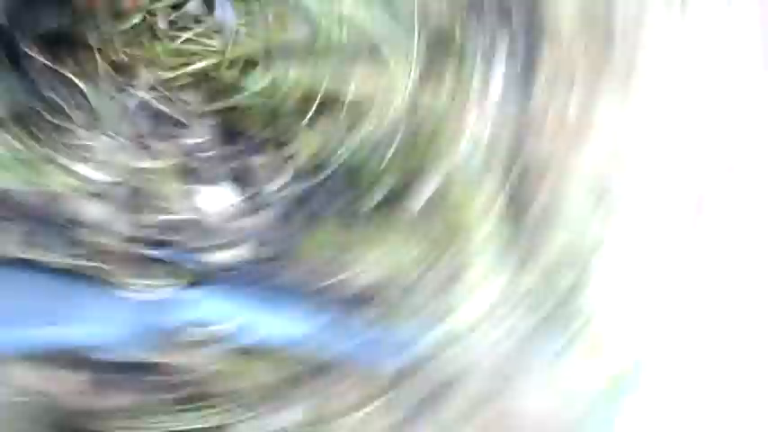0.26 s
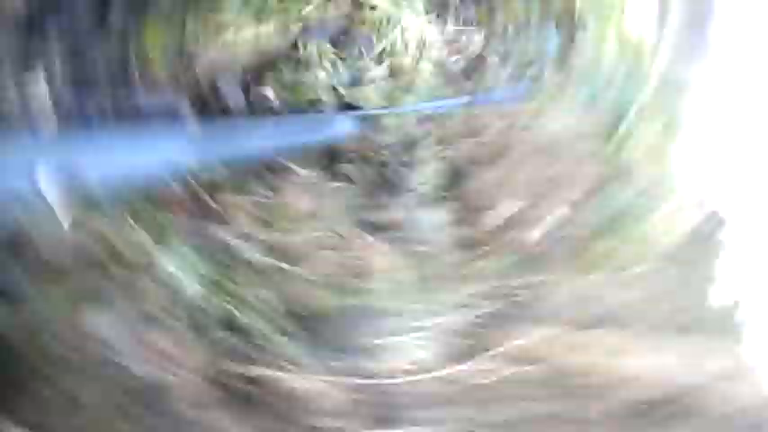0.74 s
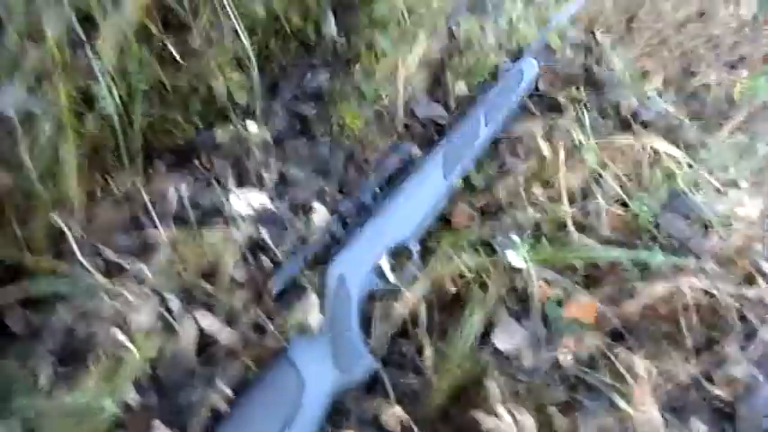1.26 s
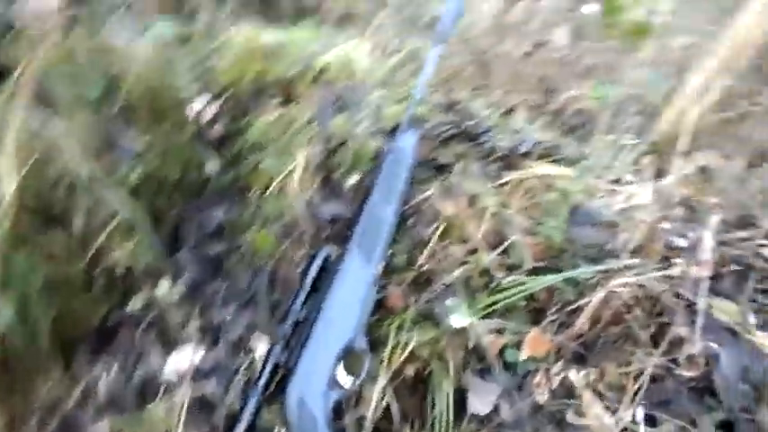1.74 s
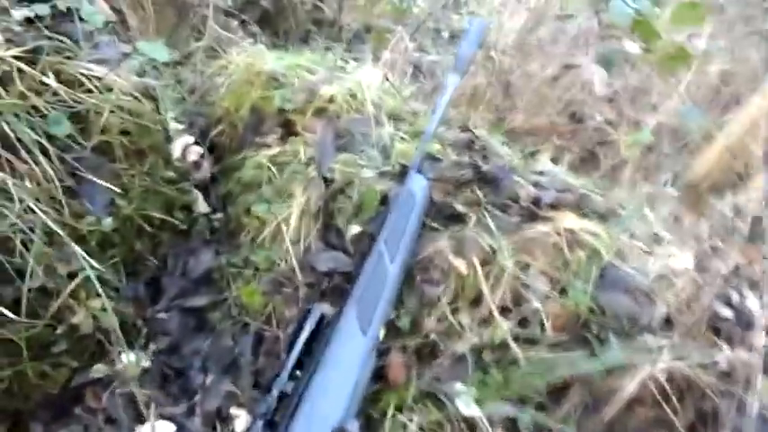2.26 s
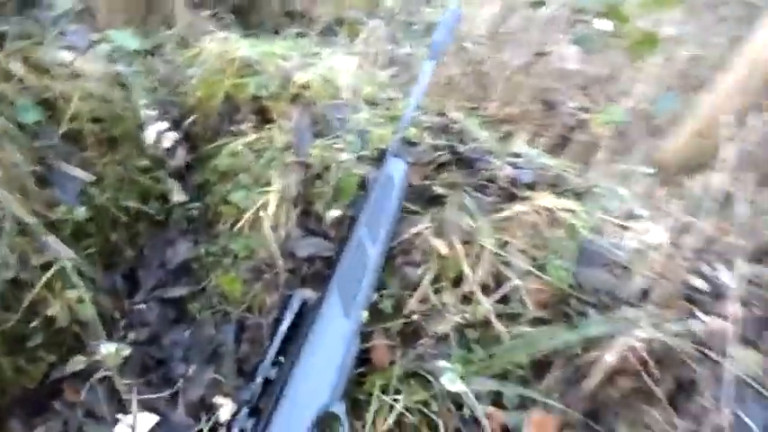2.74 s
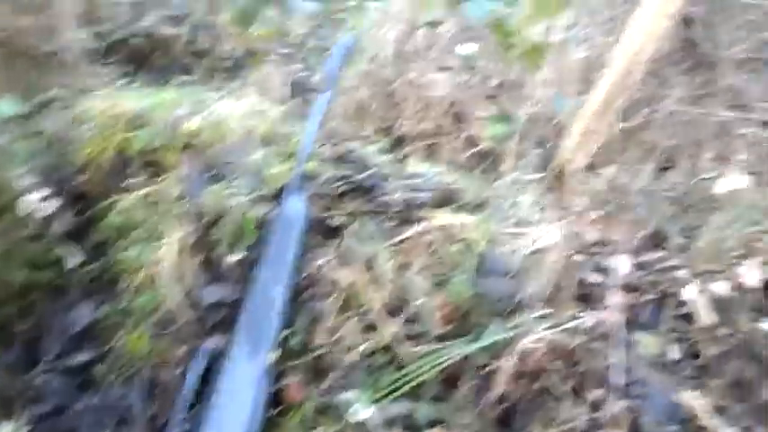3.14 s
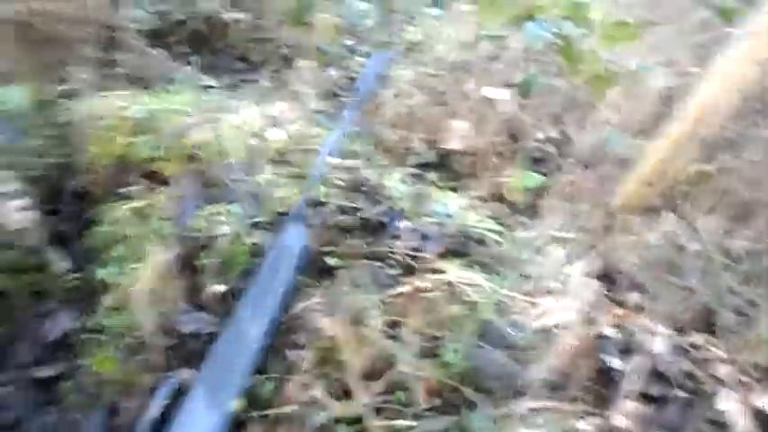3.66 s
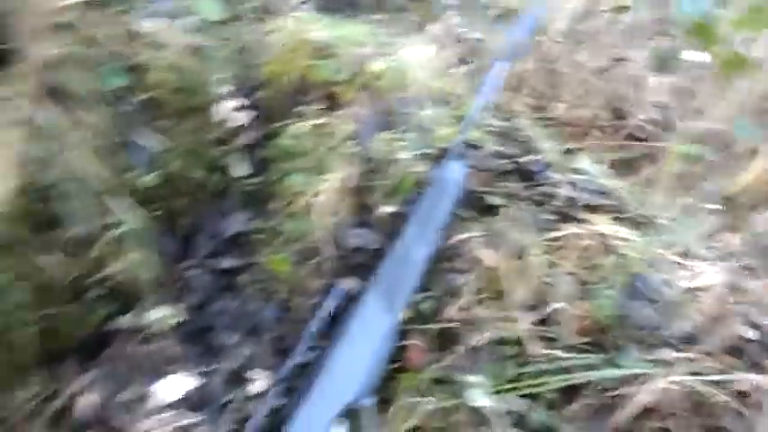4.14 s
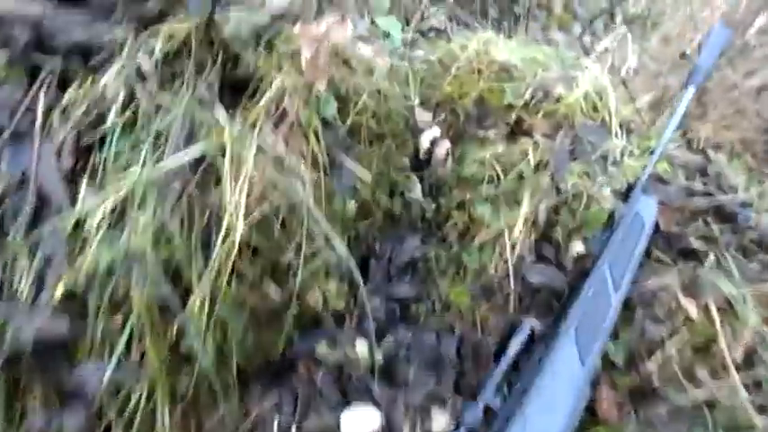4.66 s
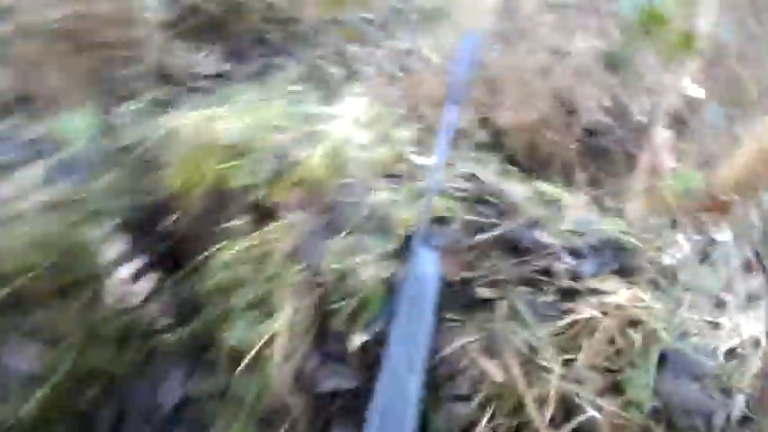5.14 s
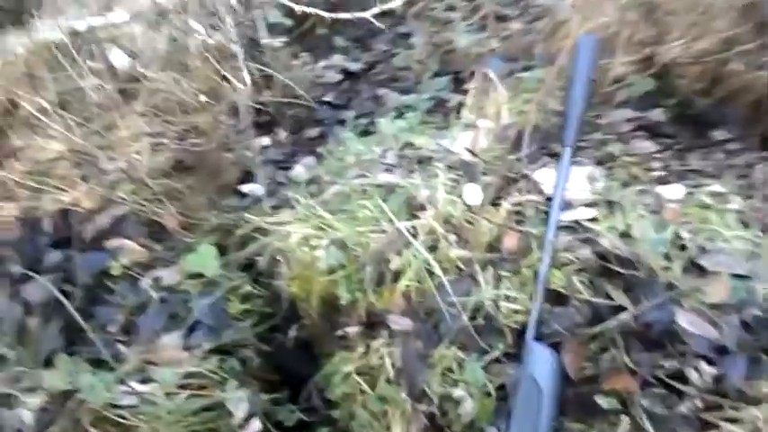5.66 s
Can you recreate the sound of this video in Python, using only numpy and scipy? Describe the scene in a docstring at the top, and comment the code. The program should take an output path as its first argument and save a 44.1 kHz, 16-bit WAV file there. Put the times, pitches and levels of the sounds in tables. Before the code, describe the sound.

Close handling of a camera over dry grass and dead leaves: early thuds and twig snaps, small creaks, then one very loud hollow clack and scrape.

```python
"""Dry grass on a lake bank

Open lake bank, everything close: someone with a hand-held camera treads and shifts in dry grass and dead leaves.
Flickering noise and grains rustle and crackle; filtered noise bursts snap as twigs and tufts under the boots.
Decaying low modes make dull bumps on the camera's case; runs of ringing slips make the grip creak.
The hardest clack rings out in a short hollow scrape. Quiet air and a thin electronic whine lie beneath."""
import sys
import numpy as np
from scipy import signal
from scipy.io import wavfile

SR = 44100
rng = np.random.default_rng(int(sys.argv[2]) if len(sys.argv) > 2 else 0)


def master(y):
    """Save y as 16-bit WAV."""
    cut = np.clip(np.atleast_2d(y).T, -1, 1)
    pcm = np.round(cut * 32767)  # scale
    wavfile.write(sys.argv[1], SR, pcm.astype(np.int16))


N = 259749
TIME = np.arange(N) / SR
# one hit in s: a 5 ms lead-in, then the spike at time 0
HIT_TIME = np.arange(-SR // 200, SR // 8) / SR


def from_db(db):
    """Decibels to gain."""
    return 10 ** (np.asarray(db) / 20)


def rms_one(x):
    """Scale to rms 1."""
    return x / np.sqrt(np.mean(x ** 2) + 1e-20)


def unit_hit(x):
    """Scale a hit to the energy of 10 ms at rms 1."""
    return x / np.sqrt(np.sum(x ** 2) / (SR / 100) + 1e-20)


def at_hz(points, hz):
    """Read a spectrum on a log-frequency axis."""
    f, db = np.transpose(points)
    return np.interp(np.log(hz), np.log(f), db)


def band(low_hz, high_hz, order=2):
    """Sections of a band-pass."""
    return signal.butter(order, [low_hz, min(high_hz, .45 * SR)], "band", fs=SR, output="sos")


def drift(rate_hz):
    """Slow random wander of rms 1: noise through two equal low-pass poles, computed every 40 samples."""
    pole = np.exp(-80 * np.pi * rate_hz / SR)
    noise = rng.standard_normal(N // 40 + 2002)
    # the first 2000 values let the filter settle
    slow = signal.lfilter([1], [1, -2 * pole, pole * pole], noise)[2000:]
    return np.interp(np.arange(N) / 40, np.arange(len(slow)), rms_one(slow))


def resonate(x, hz, width):
    """One resonance of a given width in Hz, gain 1 on top."""
    r = np.exp(-np.pi * width / SR)
    zeros = np.array([1, 0, -1]) * (1 - r * r) / 2
    poles = [1, -2 * r * np.cos(2 * np.pi * hz / SR), r * r]
    return signal.lfilter(zeros, poles, x)


def alternating_modes(x, modes, gains):
    """Resonances driven together, neighbours in opposite polarity."""
    return sum((-1) ** k * gain * from_db(db) * resonate(x, hz, width)
               for k, ((hz, width, db), gain) in enumerate(zip(modes, gains)))


def dying(t, t60):
    """Exponential decay from time 0 on, 60 dB down after t60 seconds."""
    return from_db(-60 * np.abs(t) / t60) * (t >= 0)


def spaced(first, last, count):
    """Evenly spaced values from first to last."""
    return np.linspace(first, last, max(int(round(count)), 1))


def add(out, s, hit):
    """Mix a hit in so that its spike falls at time s."""
    i = max(round((s + HIT_TIME[0]) * SR), 0)
    out[i:i + len(hit)] += hit[:N - i]


def grains(per_s, spread_db):
    """Tiny clicks of very uneven size that come in clumps; rms 1."""
    born = rng.random(N) < per_s * from_db(4 * drift(25)) / SR
    size = from_db(spread_db * np.minimum(rng.exponential(1, N), 4))
    return rms_one(born * size * rng.choice([-1, 1], N))


def coloured(colour, grain_share, patchy_db):
    """Half-octave bands of friction noise and grains, each flickering: (centres Hz, bands)."""
    edges = np.geomspace(28, 18000, num=20)
    centres = np.sqrt(edges[:-1] * edges[1:])
    share = np.clip(grain_share, 0, 1)
    # neighbouring bands take turns at two independent drives
    drives = [np.sqrt(1 - share) * rng.standard_normal(N)
              + np.sqrt(share) * grains(per_s=1500, spread_db=3.0) for _ in range(2)]
    bands = []
    for k, hz in enumerate(centres):
        flicker = from_db(at_hz(colour, hz) + patchy_db * drift(17.0))
        bands.append(signal.sosfilt(band(edges[k], edges[k + 1]), drives[k % 2]) * flicker)
    return centres, np.array(bands)


def fracture(t60, tail_db, tail_t60, spike):
    """A short swell of noise leads into a spike and a quick burst; a fainter noise tail follows."""
    swell = from_db(-4.5) * dying(-HIT_TIME, t60=0.0076)
    burst = dying(HIT_TIME, t60) + from_db(tail_db) * dying(HIT_TIME, tail_t60)
    return rng.standard_normal(len(HIT_TIME)) * (swell + burst) + spike * (HIT_TIME == 0)


def below_cut(x):
    """A small case radiates almost no deep bass."""
    return signal.sosfilt(signal.butter(2, 200, "high", fs=SR, output="sos"), x)


# low modes of the case: f/Hz, relative level/dB, t60/s at ring 1
CASE_MODES = [(255, -11, .025), (345, 0, .045), (378, -5, .1), (450, -13, .025), (590, -18, .035),
              (775, -16, .065)]


def case_thud(ring):
    """The case rings low; a firm hand damps it, and each blow weights the modes a little differently."""
    weights = from_db(1.3 * rng.standard_normal(len(CASE_MODES)))
    modes = [weight * from_db(db) * dying(HIT_TIME, t60 * ring) * np.cos(2 * np.pi * hz * HIT_TIME)
             for (hz, db, t60), weight in zip(CASE_MODES, weights)]
    # the padded contact passes little above the modes
    padded = signal.sosfilt(signal.butter(2, 1000, fs=SR, output="sos"), sum(modes))
    return unit_hit(below_cut(padded))


# still air on the bank: f/Hz, relative density level/dB per Hz
AIR_COLOUR = [(30, -11), (100, 9.5), (350, 0), (950, 2), (2000, -19), (5500, -7.5), (11500, -41),
              (15500, -34)]
AIR_DB = -61.5  # rms into the microphone
WHINE_HZ, WHINE_DB = 11700, -66  # rms into the microphone


def air():
    """Smooth outdoor hush and a thin electronic whine of the camera: narrow noise at one pitch."""
    _, bands = coloured(AIR_COLOUR, grain_share=0, patchy_db=-1.0)
    whine = resonate(rng.standard_normal(N), WHINE_HZ, width=110)
    whine = rms_one(resonate(whine, WHINE_HZ, width=110))
    return from_db(AIR_DB) * rms_one(bands.sum(axis=0)) + from_db(WHINE_DB) * whine


# a leg or sleeve sweeps through the blades close by: start t/s, length/s, brushing level/dB,
# weight level/dB and hiss level/dB, both relative to the brushing
SWISHES_CLOSE = [(0, 0.028, -32, -4, -11), (.31, .11, -33.5, -1, -11), (.98, 0.046, -43, -4, -22),
                 (1.05, 0.083, -38.5, -6, -29.5), (1.23, 0.069, -39.5, -11, -7.5),
                 (2.1, 0.12, -45.5, 6, -18), (2.73, 0.064, -45.5, 0.5, -13), (3.17, 0.11, -50, 5, -7),
                 (3.651, 0.03, -35.5, -20, -14), (3.815, 0.062, -48, -7, 8), (3.89, 0.045, -33, 7, -1.5),
                 (4.5, 0.092, -48, 3.5, 8), (4.95, 0.067, -56, 7, -1), (5.269, .14, -34.5, -3, 0),
                 (5.4, .13, -39, -7, -18), (5.74, 0.07, -43, 4.5, 1.5)]
# the swell is centred on the start, the ease-off is a decay constant; shares of the length
SWELL_SHARE, EASE_SHARE = 0.87, 0.16


def swish_powers():
    """Each swish swells, holds and eases off: power of pressing, brushing and hiss over time."""
    power = np.zeros((3, N))
    for s, length, db, weight_db, hiss_db in SWISHES_CLOSE:
        phase = (TIME - s) / length
        swell = np.clip(phase / SWELL_SHARE + .5, 0, 1)
        ease = np.exp(-np.maximum(phase - 1, 0) / EASE_SHARE)
        levels = from_db([[db + weight_db], [db], [db + hiss_db]])
        power += (levels * swell * ease) ** 2
    return power


# changing stir of grass and clothing: t/s, then control level/dB of the
# pressing (lows), the brushing (middle) and the hiss (top)
STIR_LEVELS = [(0, -39.5, -34.5, -43.5), (0.28, -40.5, -38.5, -41), (0.46, -37, -45, -41.5),
               (0.7, -42.5, -44, -44.5), (0.79, -43.5, -50, -50), (1.16, -43.5, -46, -43),
               (1.4, -43.5, -46, -56.5), (1.6, -41, -47, -52.5), (1.98, -48, -50, -55.5),
               (2.15, -44.5, -45, -49.5), (2.72, -47.5, -45.5, -48.5), (2.95, -55, -52.5, -58.5),
               (3.48, -43.5, -46, -48), (3.72, -50, -46.5, -56), (3.98, -39, -47, -51),
               (4.18, -39.5, -44.5, -45.5), (4.38, -49, -49, -48.5), (4.62, -51.5, -47, -46),
               (4.86, -50.5, -50, -52), (5.2, -41, -45, -39), (5.54, -41, -44, -46),
               (5.89, -51, -44.5, -44)]
# colour of the rustle: f/Hz, relative density level/dB per Hz
RUSTLE_SPECTRUM = [(30, -20), (60, -10.5), (130, -7.5), (230, 1), (350, 5.5), (560, -6.5), (950, -4.5),
                   (1400, -15.5), (2400, -13), (4200, 0.5), (6500, -7), (8500, 0), (11500, -2),
                   (15500, -6.5)]
# resonances that a swish excites: f/Hz, width/Hz, relative level/dB
SWISH_RESONANCES = [(930, 95, 3), (1800, 570, -11), (2800, 120, -15.5), (4120, 160, -12),
                    (5050, 130, -17.5)]
SWISH_RING_DB = -3  # relative to the brushing of the swishes


def rustle():
    """Pressing gives the lows, brushing the middle, dry blade edges the hiss; blades tick, leaves crunch at random."""
    s, *columns = np.transpose(STIR_LEVELS)
    swishing = swish_powers()
    stir = from_db([np.interp(TIME, s, db) for db in columns])
    press, brush, hiss = np.sqrt(stir ** 2 + swishing)

    centres, bands = coloured(RUSTLE_SPECTRUM, grain_share=0.32, patchy_db=2.4)
    out = np.zeros(N)
    for gain, weights in [(press, [1, 0, 0, 0]), (brush, [0, 1, 1, 0]), (hiss, [0, 0, 0, 1])]:
        # the three registers fade into each other
        shares = np.interp(np.log(centres), np.log([400, 800, 1400, 3400]), weights)
        out += gain * from_db(-1.47) * rms_one(shares @ bands)

    ticks = sum(rms_one(resonate(grains(per_s=26, spread_db=2.0), hz, width=hz / 4))
                for hz in [1900, 3800, 6500, 9800])
    crunch = sum(rms_one(resonate(grains(per_s=45, spread_db=2.0), hz, width=hz / 5))
                 for hz in [560, 800, 1050])
    friction = grains(per_s=3300, spread_db=3.5)
    ring = rms_one(alternating_modes(friction, SWISH_RESONANCES, np.ones(len(SWISH_RESONANCES))))
    out += hiss * from_db(-16) * ticks
    out += brush * from_db(-11.5) * crunch
    return out + np.sqrt(swishing[1]) * from_db(SWISH_RING_DB) * ring


def snap(db, sharp_db, thud_db, wood_hz, stalk_hz, splinter_db):
    """One stalk breaks with a knock, a crack and splinters; the case thuds along."""
    knock = signal.sosfilt(band(596, 2080), fracture(t60=.011, tail_db=-18, tail_t60=.05, spike=5))
    crack = signal.sosfilt(band(2450, 6570), fracture(t60=0.0041, tail_db=-13.5, tail_t60=0.023, spike=10.0))
    splinter = signal.sosfilt(band(8100, 14500), fracture(t60=0.0071, tail_db=-40, tail_t60=0.018, spike=1.0))
    low = unit_hit(knock + 1.87 * resonate(knock, wood_hz, width=150))
    high = unit_hit(crack + 2.54 * resonate(crack, stalk_hz, width=350))
    high = high + from_db(splinter_db) * unit_hit(splinter)
    wood = unit_hit(low + from_db(sharp_db) * high)
    return from_db(db) * wood + from_db(thud_db) * case_thud(ring=1.0)


# single twigs and stalks breaking underfoot: t/s, level/dB (rms over 10 ms, into the microphone),
# crack over knock level/dB, thud in the case level/dB, knock f/Hz, crack f/Hz
TWIG_SNAPS = [(.019, -24, -7, -20.5, 1060, 2600), (0.0274, -29, -13, -24, 1620, 2600),
              (0.2638, -19, -22, -24, 930, 2600), (0.3109, -29, -20, -43, 1000, 2600),
              (.406, -28, -5, -49, 884, 2630), (.5379, -29.5, -3, -45, 1710, 2630),
              (0.7872, -39.5, 10, -31, 840, 7300), (0.8487, -39, -1, -32.5, 960, 3600),
              (0.863, -33, 5, -34.5, 990, 4170), (.8887, -35.5, 9, -47, 1300, 3570),
              (.976, -15, 10.5, -50, 1590, 5560), (1.1352, -40, 3, -45, 1660, 2600),
              (1.1565, -37, 10, -51, 1420, 3800), (2.1085, -36, -10, -37, 810, 2450),
              (2.7832, -40, 6, -54, 790, 3800), (2.98, -52, 16, -62, 1000, 6900),
              (3.3909, -47.5, 22, -47, 980, 7400), (3.6794, -43, -1, -48, 1007, 7260),
              (3.517, -12.5, -12.5, -17, 1150, 2600), (3.524, -17.5, -9.5, -20.5, 1590, 7400),
              (3.5363, -11, -15, -28, 1140, 2600), (3.5448, -2, 6, -31, 1140, 6500),
              (3.656, -34, 8, -35, 850, 3700), (3.8415, -32, 0, -36, 1240, 3900),
              (3.9104, -12.5, -13, -33, 1800, 2600), (4.2519, -30, 0, -31.5, 1280, 4270),
              (4.3167, -29.5, -3, -32, 1260, 6400), (4.659, -35, 0, -30, 1390, 4320),
              (4.6939, -40.5, 1, -32, 880, 2590), (4.818, -31, -4.5, -32, 2090, 4290),
              (5.0621, -37.5, 2, -41.5, 1270, 3840), (5.1487, -31.5, -3, -22.5, 1250, 2570),
              (5.1546, -23, 7, -29, 1800, 3800), (5.1987, -26, 6, -32, 1720, 3970),
              (5.2331, -30.5, -2.5, -26, 980, 2800), (5.3885, -29, -5, -26.5, 970, 6150),
              (5.6248, -32.5, -1, -31.5, 1460, 4400), (5.831, -35.5, -4.5, -30, 910, 4360)]
SPLINTER_DB = -8.5  # splinters of a middling snap, relative to its crack
# loud cracks come from thick twigs, which splinter less: dB lost per dB above a middling snap
SPLINTER_LOSS, MIDDLING_DB = 0.36, -25


def snaps():
    """Single twigs break under the boots."""
    out = np.zeros(N)
    for s, db, sharp_db, thud_db, wood_hz, stalk_hz in TWIG_SNAPS:
        above_middling = db + min(sharp_db, 0) - MIDDLING_DB
        splinter_db = SPLINTER_DB - SPLINTER_LOSS * above_middling
        add(out, s, snap(db, sharp_db, thud_db, wood_hz, stalk_hz, splinter_db))
    return out


# a tuft gives way underfoot: first t/s, last t/s, stalks (rounded to whole ones), typical level/dB,
# crack over knock level/dB, case thud level/dB, splinters level/dB relative to the crack
TUFT_CRUNCHES = [(0.2053, 0.216, 2, -31, -10, -31.5, -15), (.3199, 0.403, 4, -31, -8, -36, -7),
                 (3.555, 3.588, 4.03, -36, -14, -23.5, -9), (3.878, 3.8835, 2.4, -30, -2, -31, -5),
                 (3.9012, 3.9225, 5.27, -21, -1, -25, 4), (4.4887, 4.5637, 4, -36.5, 1.5, -33.5, -5),
                 (5.7667, 5.771, 2.44, -33.5, 1, -34, 1.5)]
KNOCK_HZ, STALK_HZ = 1180, 3990  # typical knock and crack pitch
# scatter of pitch (octaves), level (dB) and time (share of the run's length per stalk)
STALK_SCATTER, STALK_SCATTER_DB, SPACING_SCATTER = 0.22, 1, .12


def crunches():
    """The stalks of a tuft break in quick succession, each a little different."""
    out = np.zeros(N)
    for first, last, stalks, db, sharp_db, thud_db, splinter_db in TUFT_CRUNCHES:
        for s in spaced(first, last, count=stalks):
            late, louder, higher = rng.standard_normal(3)
            pitch = 2 ** (STALK_SCATTER * higher)
            shift = late * SPACING_SCATTER * (last - first) / stalks
            stalk = snap(db + STALK_SCATTER_DB * louder, sharp_db, thud_db,
                         KNOCK_HZ * pitch, STALK_HZ * pitch, splinter_db)
            add(out, s + shift, stalk)
    return out


# dull bumps on the camera, at the microphone: t/s, blow level/dB before a fixed trim, thud f/Hz
CAMERA_BUMPS = [(0.3098, -19, 385), (.3504, -6, 317), (0.3806, -23, 410), (0.4113, -17, 294),
                (.446, -30.5, 310), (.548, -30, 386), (.7658, -9, 325), (.7698, -15, 383),
                (1.224, -32.5, 354), (1.2865, -28.5, 265), (4.029, -30.5, 362), (4.2986, -30, 354),
                (4.965, -30, 370), (5.2082, -22, 393)]
# the knock follows the blow (relative dB); the grit is the same at any force (dB)
BUMP_KNOCK_DB, BUMP_GRIT_DB = -21, -43.5


def bumps():
    """Soft, heavy contacts: a thud of a few cycles with a brief overtone, a little case ring and grit on top."""
    out = np.zeros(N)
    knock_band, grit_band = band(430, 1980), band(1800, 3900, order=1)
    for s, blow_db, hz in CAMERA_BUMPS:
        turn = 2 * np.pi * hz * HIT_TIME
        thud = dying(HIT_TIME, t60=.026) * np.sin(turn)
        thud = thud + .55 * dying(HIT_TIME, t60=.016) * np.sin(1.9 * turn)
        body = unit_hit(unit_hit(below_cut(thud)) + from_db(-6.5) * case_thud(ring=0.54))
        knock = signal.sosfilt(knock_band, fracture(t60=.016, tail_db=-20, tail_t60=.04, spike=9))
        grit = signal.sosfilt(grit_band, fracture(t60=0.018, tail_db=-11, tail_t60=0.034, spike=8.3))
        hit = from_db(blow_db - 2.5) * body
        hit = hit + from_db(blow_db + BUMP_KNOCK_DB) * unit_hit(knock)
        add(out, s, hit + from_db(BUMP_GRIT_DB) * unit_hit(grit))
    return out


# runs of evenly spaced slips of the grip, at the microphone: first t/s, last t/s,
# slips (rounded to whole ones when played), first and last thud level/dB
GRIP_CREAKS = [(1.383, 1.4114, 2.3, -39.5, -41), (1.4547, 1.4964, 4.2, -41, -48),
               (1.5043, 1.515, 1.8, -32.5, -27.5), (1.521, 1.629, 5.85, -31.5, -26.5),
               (1.6606, 1.687, 2.5, -24.5, -29), (1.7214, 1.9015, 3.39, -28.5, -25.5),
               (3.7386, 3.7994, 3, -20, -27), (3.7838, 3.809, 1.6, -34, -27)]
# resonances of the case that colour a creak: f/Hz, width/Hz, relative level/dB
CREAK_RESONANCES = [(775, 80, 2), (1050, 150, -4), (1800, 240, 0), (2120, 250, -5), (2850, 330, -3),
                    (4020, 420, -5), (7000, 700, -9), (7800, 300, -15), (11500, 1500, -14),
                    (14500, 1800, -16)]
# tick relative to the thud (dB) after a 20 ms hold, and its rise per doubling of the hold (dB)
SLIP_TICK_DB, TICK_DB_PER_DOUBLING = -10, 3
SLIP_SCATTER_DB = 3  # each slip weights the resonances a little differently
SLIP_DIRECT_DB = -7.5  # bare click of a slip, relative to its resonances


def creaks():
    """The grip sticks and slips; every slip rings the same plastic resonances, more sharply after a longer hold."""
    out = np.zeros(N)
    click_band = band(1400, 8200, order=1)
    for first, last, slips, first_db, last_db in GRIP_CREAKS:
        hold_s = (last - first) / max(slips - 1, 1)
        tick_db = SLIP_TICK_DB + TICK_DB_PER_DOUBLING * np.log2(hold_s / .02)
        times = spaced(first, last, count=slips)
        levels = spaced(first_db, last_db, count=slips)
        for s, db in zip(times, levels):
            slip = fracture(t60=.003, tail_db=-17, tail_t60=.03, spike=6)
            weights = from_db(SLIP_SCATTER_DB * rng.standard_normal(len(CREAK_RESONANCES)))
            tick = unit_hit(alternating_modes(slip, CREAK_RESONANCES, weights))
            click = unit_hit(signal.sosfilt(click_band, slip))
            tick = unit_hit(tick + from_db(SLIP_DIRECT_DB) * click)
            add(out, s, from_db(db) * (case_thud(ring=1.38) + from_db(tick_db) * tick))
    return out


# a hard object drags on the case after the clack: t/s, level/dB (rms into the microphone)
SCRAPE_LEVELS = [(3.545, -50), (3.56, -15.5), (3.58, -32), (3.605, -30.5), (3.635, -38), (3.66, -31.5),
                 (3.68, -29), (3.693, -68)]
# resonances of the scrape: f/Hz, width/Hz, relative level/dB
SCRAPE_RESONANCES = [(348, 23, 6.5), (790, 43, -3), (1140, 62, -0.5), (1800, 120, -14.5),
                     (2580, 390, -17.5), (3700, 620, -16.5), (5400, 660, -16.5), (7400, 380, -23),
                     (9100, 620, -48)]
# ring that the hardest clack leaves in the case: f/Hz, starting peak level/dB, t60/s
CLACK_RING = [(334, -13, .24), (738, -21, .16), (1040, -18, .07), (1136, -20, .15), (1295, -18, .06),
              (1836, -30, .13)]
CLACK_S = 3.545


def scrape():
    """The clack rings hollow; dense uneven slips keep the resonances going until the contact lifts."""
    slips = grains(per_s=2500, spread_db=3.0)
    body = rms_one(sum(from_db(db) * resonate(slips, hz, width) for hz, width, db in SCRAPE_RESONANCES))
    drag = from_db(np.interp(TIME, *np.transpose(SCRAPE_LEVELS), left=-200, right=-200))
    t = TIME - CLACK_S
    ring = sum((-1) ** k * from_db(db) * dying(t, t60) * np.sin(2 * np.pi * hz * t)
               for k, (hz, db, t60) in enumerate(CLACK_RING))
    return body * drag + ring


def scene():
    """Everything is close and in the open, without a room."""
    return (air() + rustle() + snaps() + crunches() + bumps() + creaks() + scrape())[None]


CUTOFF_HZ = 15950


def record(dry):
    """The loudest cracks overload the microphone; the deepest bass and the top are cut."""
    clipped = dry / (1 + dry ** 6) ** (1 / 6)
    clipped = signal.sosfilt(signal.butter(1, 30, "high", fs=SR, output="sos"), clipped)
    return signal.sosfilt(signal.ellip(10, .1, 90, CUTOFF_HZ, fs=SR, output="sos"), .93 * clipped)


dry = scene()
out = record(dry)
master(out)
```